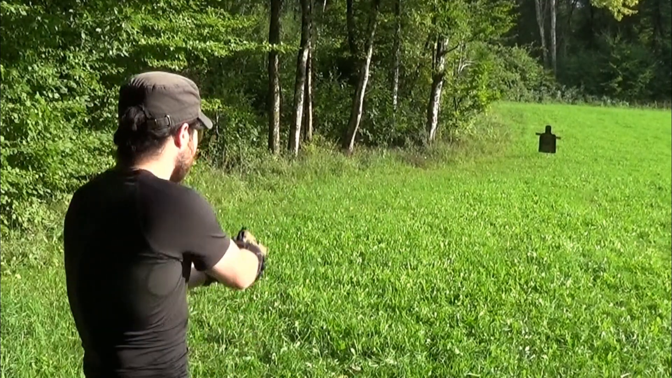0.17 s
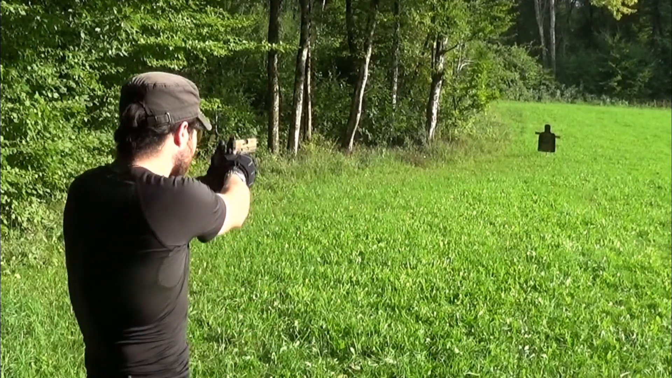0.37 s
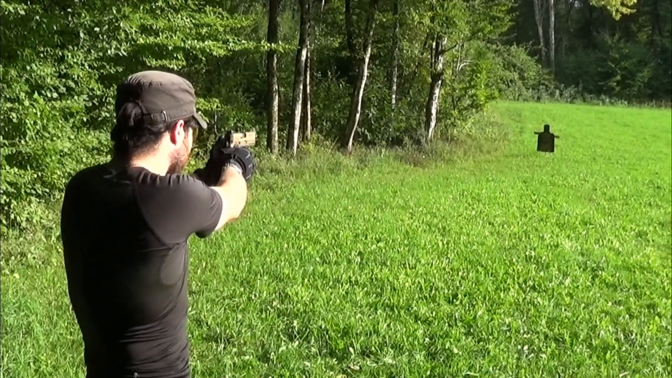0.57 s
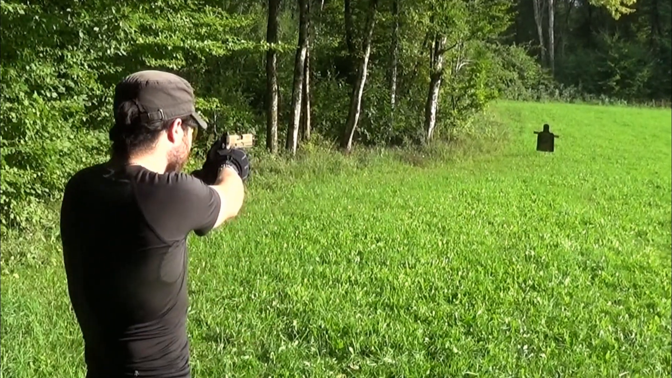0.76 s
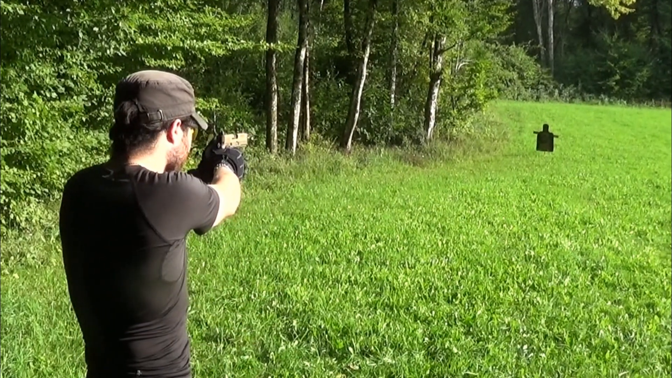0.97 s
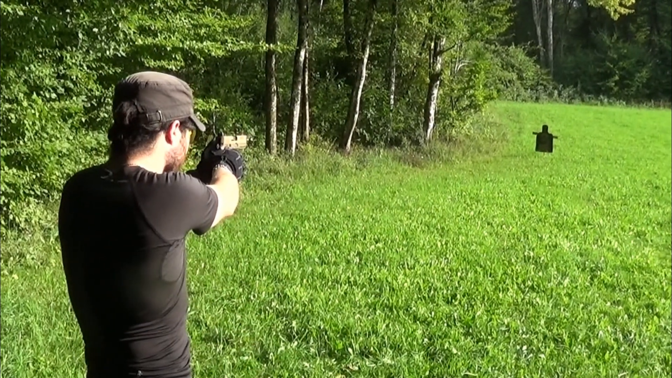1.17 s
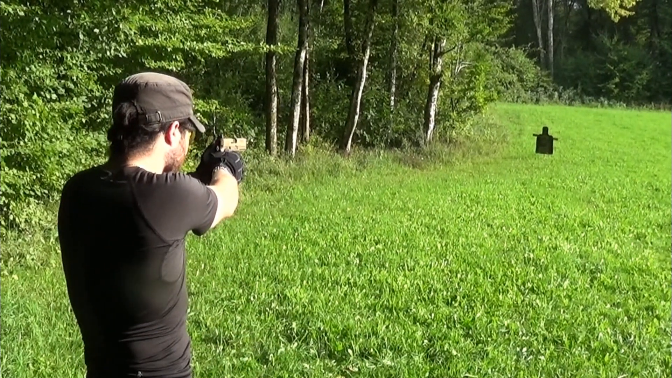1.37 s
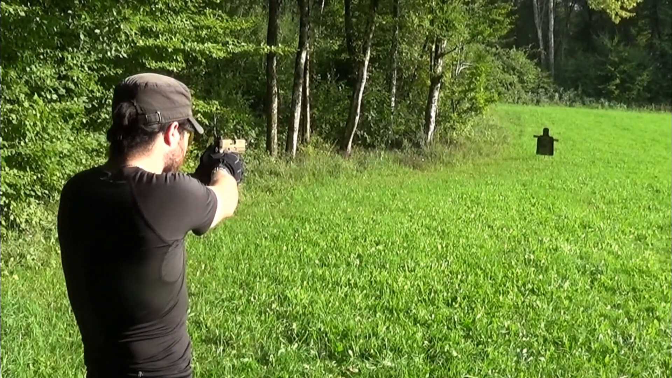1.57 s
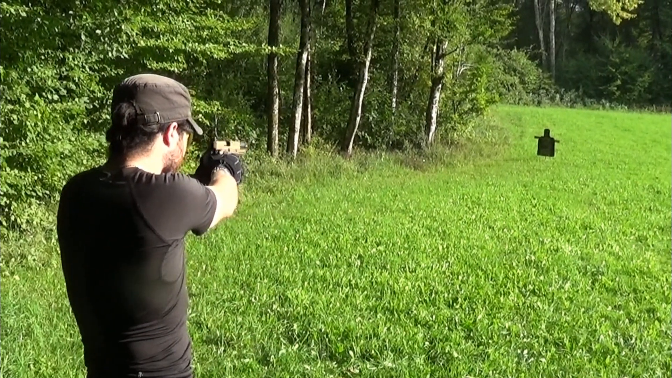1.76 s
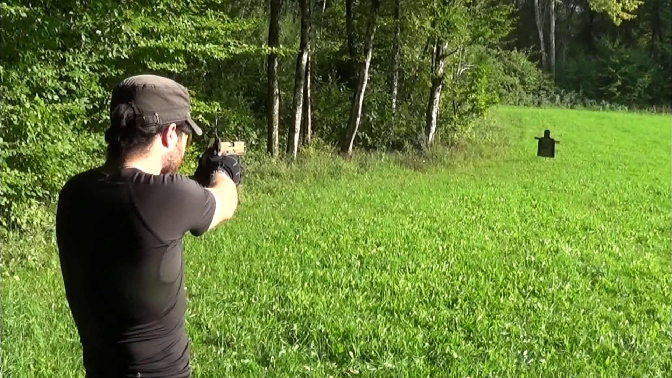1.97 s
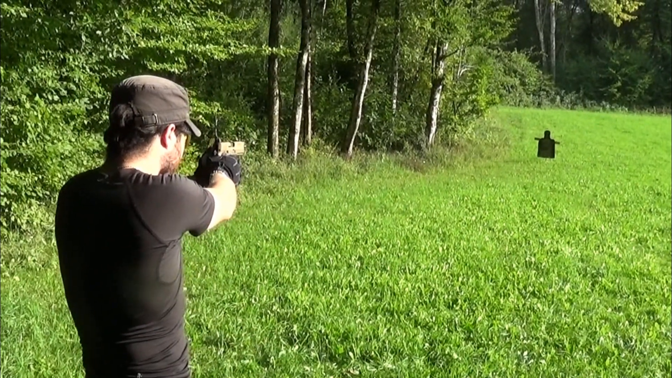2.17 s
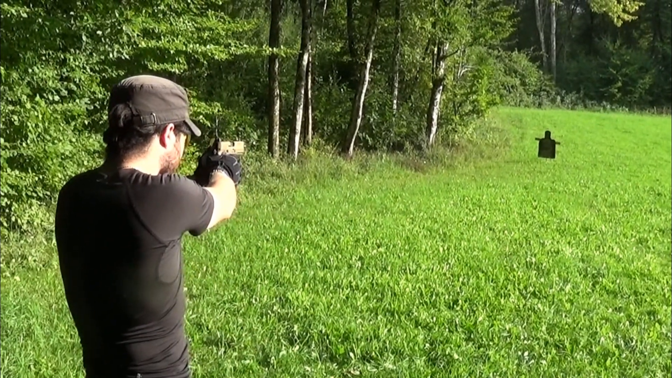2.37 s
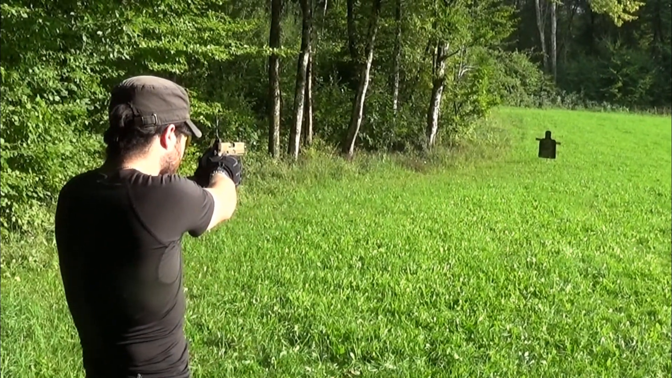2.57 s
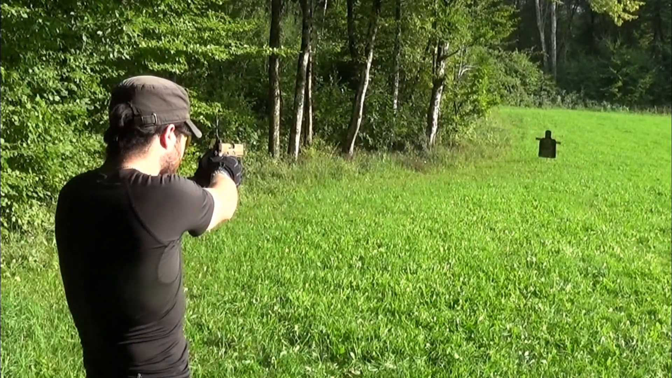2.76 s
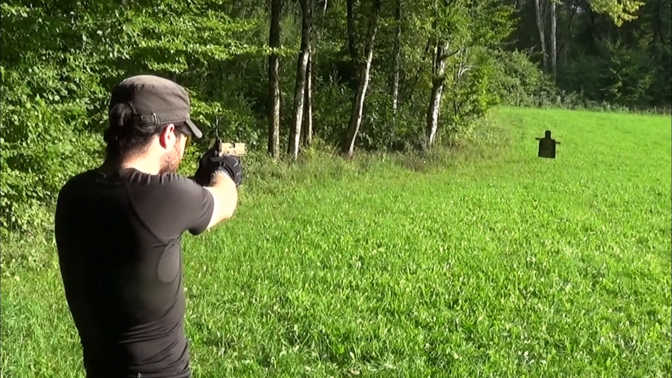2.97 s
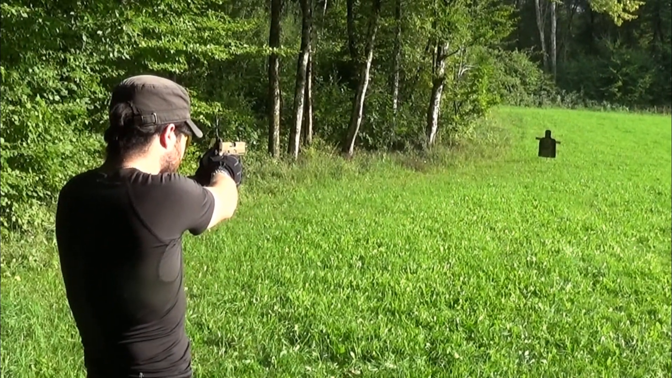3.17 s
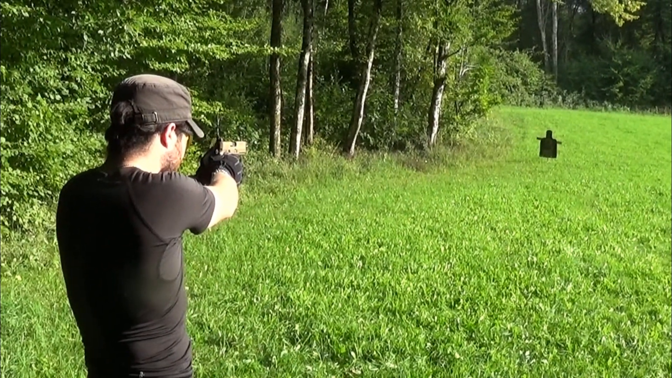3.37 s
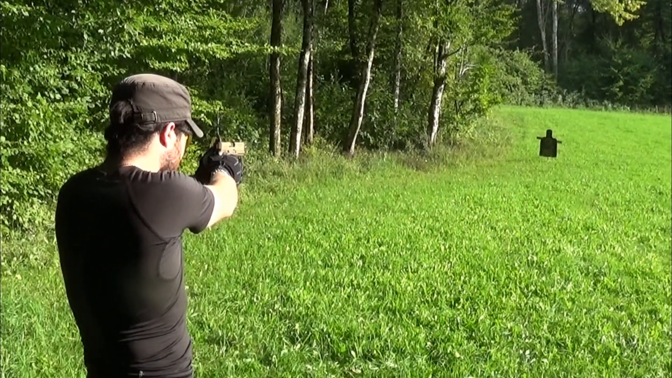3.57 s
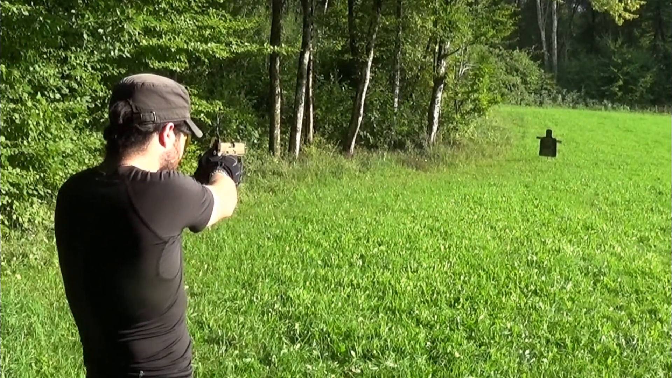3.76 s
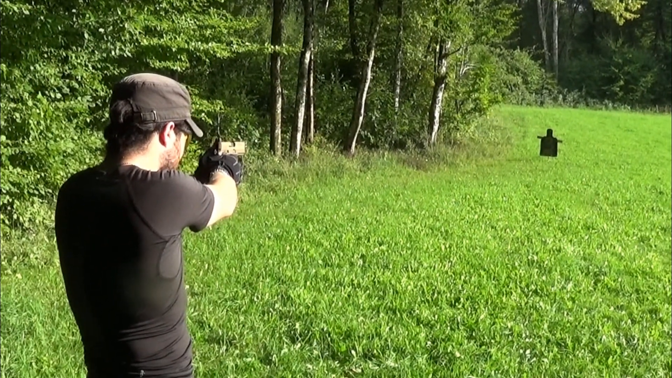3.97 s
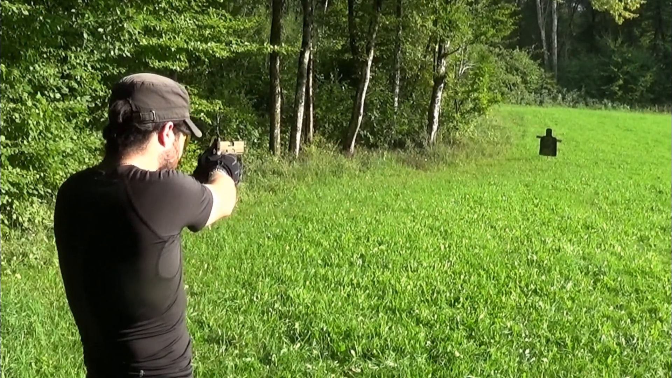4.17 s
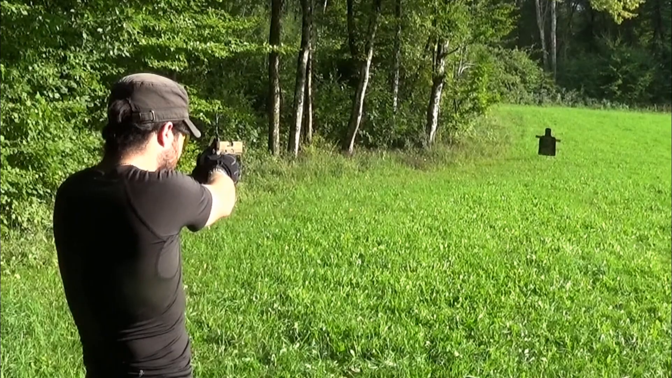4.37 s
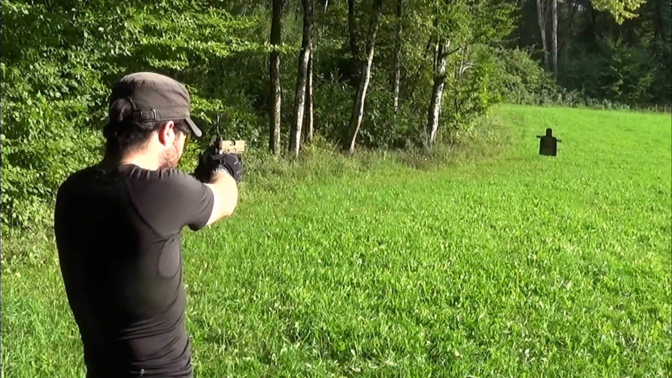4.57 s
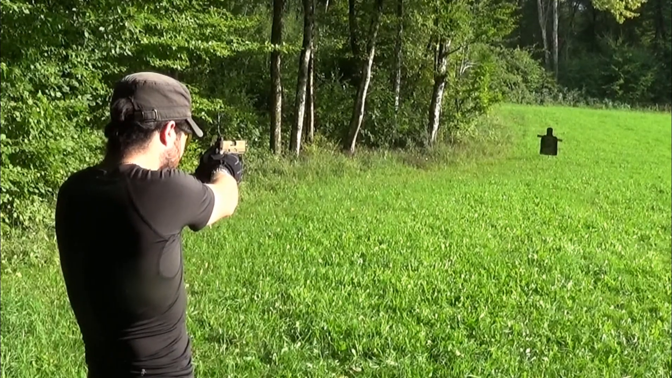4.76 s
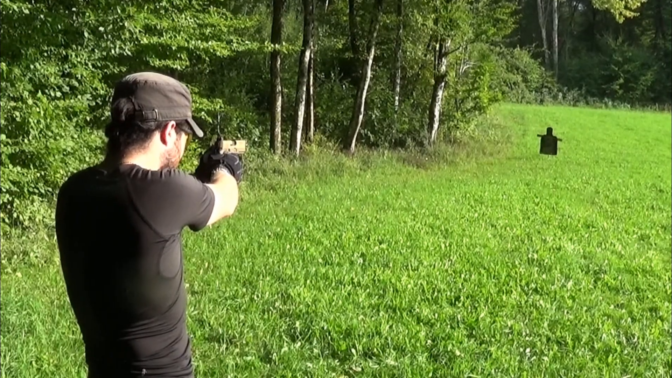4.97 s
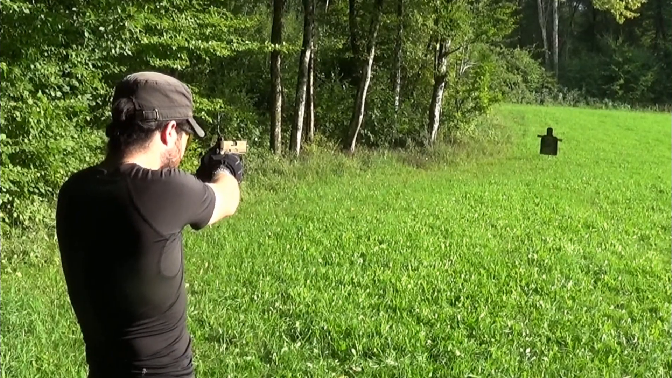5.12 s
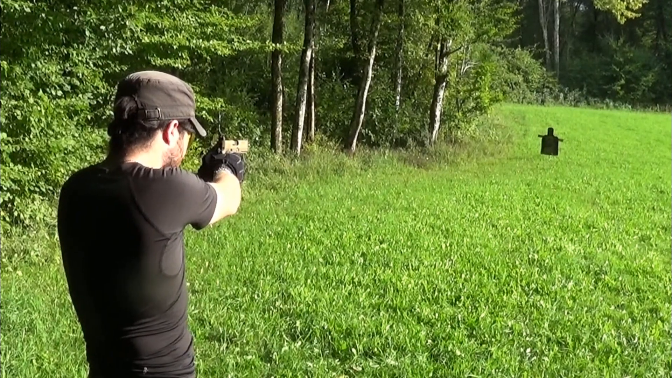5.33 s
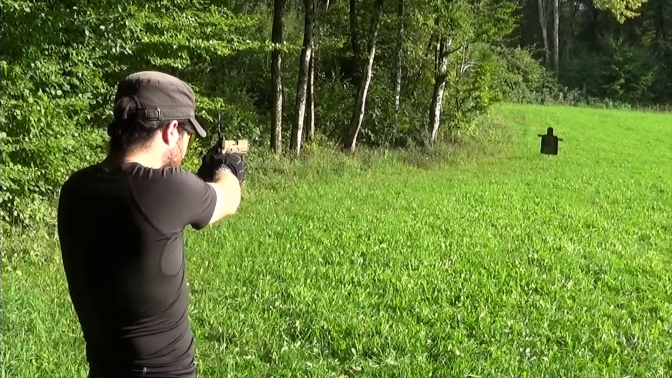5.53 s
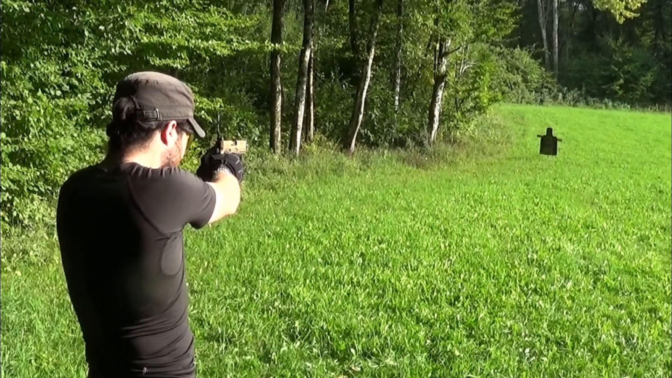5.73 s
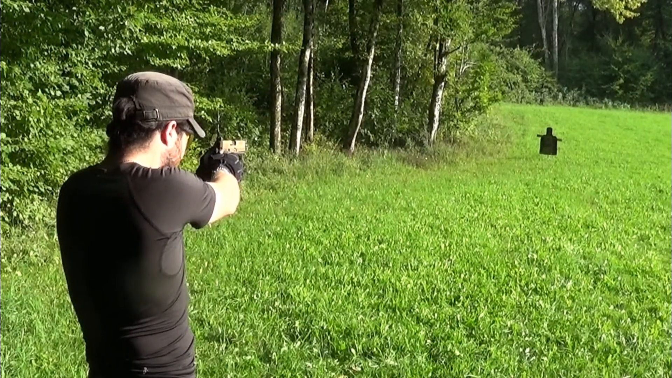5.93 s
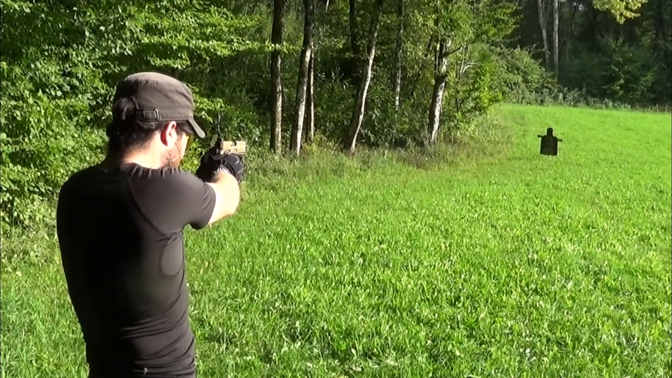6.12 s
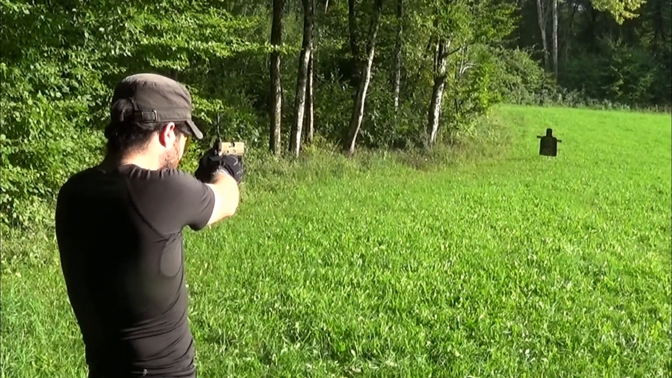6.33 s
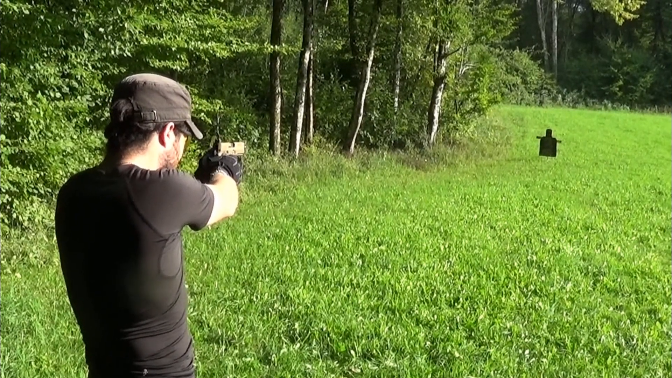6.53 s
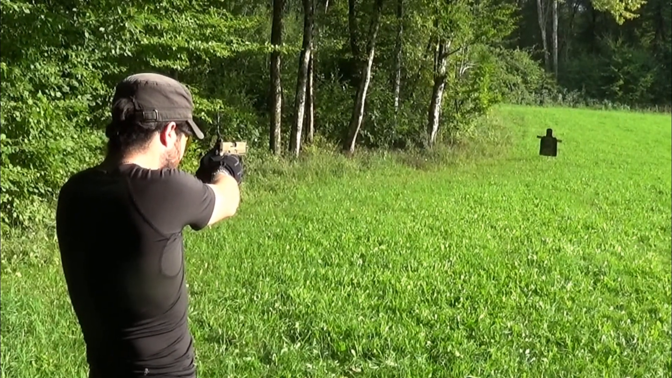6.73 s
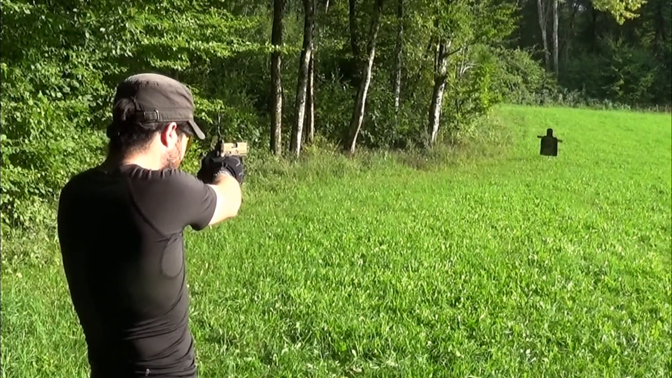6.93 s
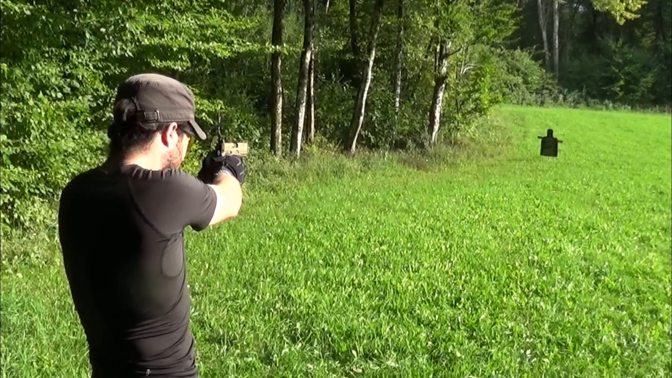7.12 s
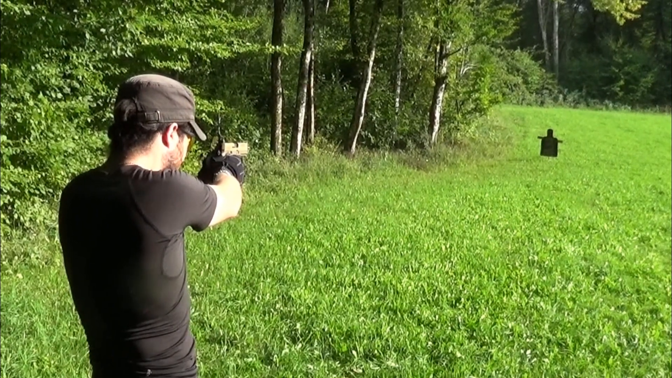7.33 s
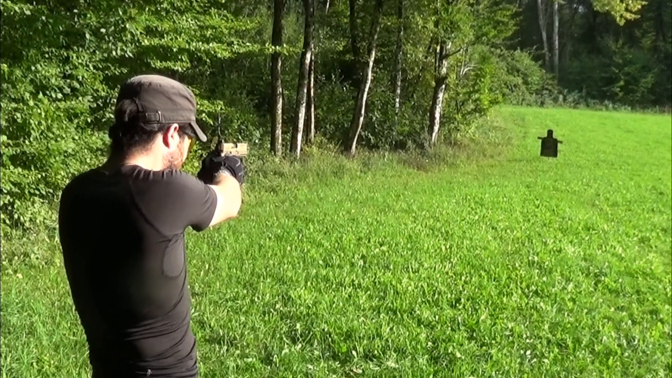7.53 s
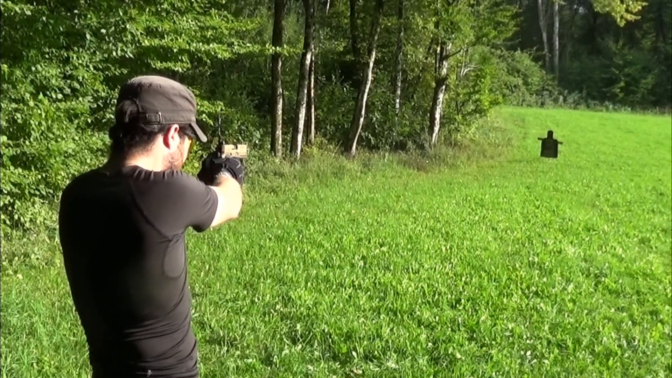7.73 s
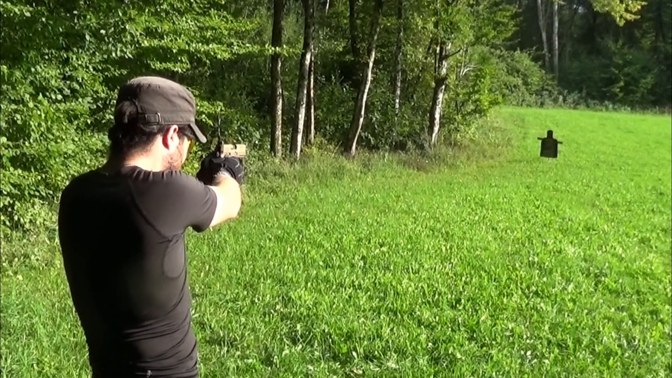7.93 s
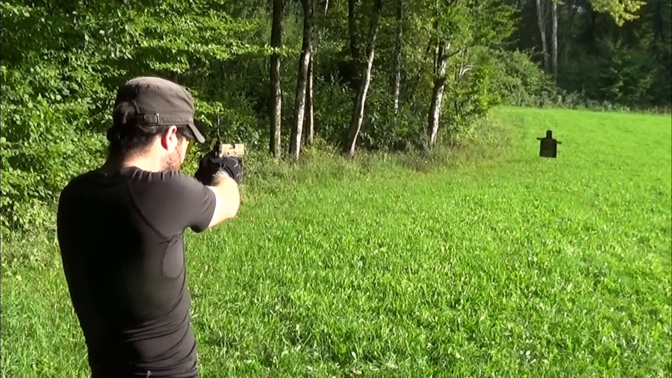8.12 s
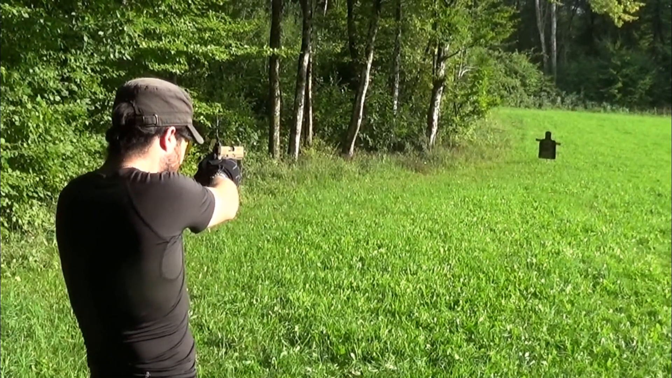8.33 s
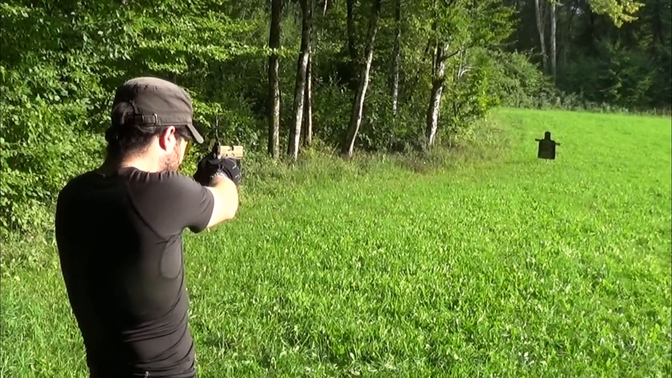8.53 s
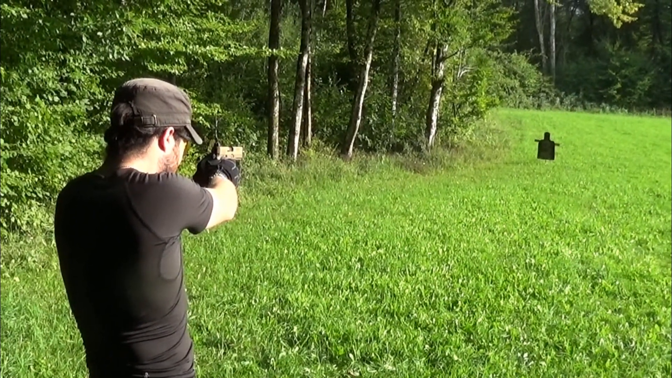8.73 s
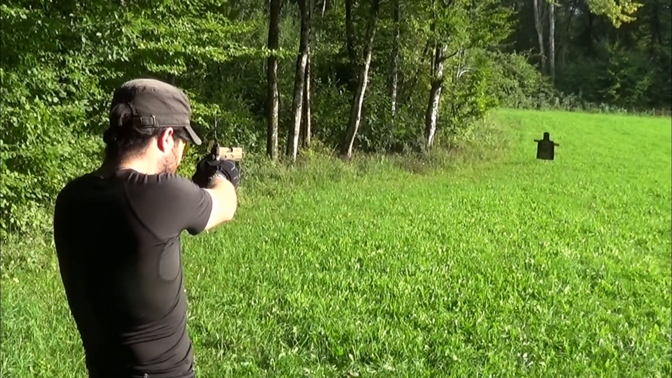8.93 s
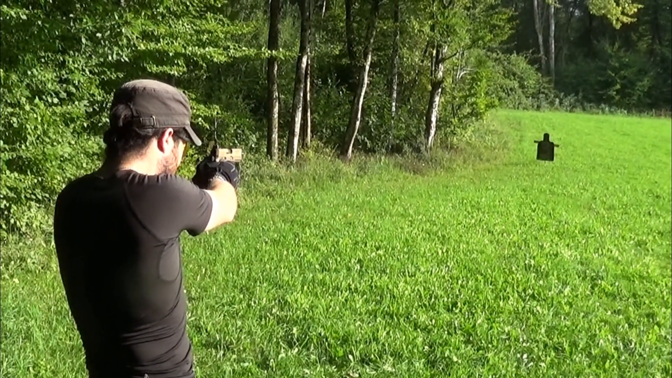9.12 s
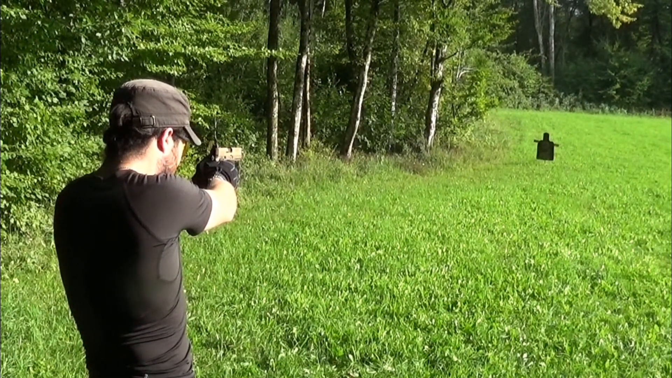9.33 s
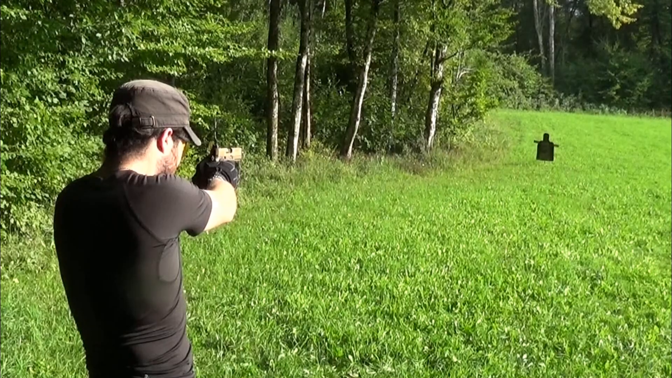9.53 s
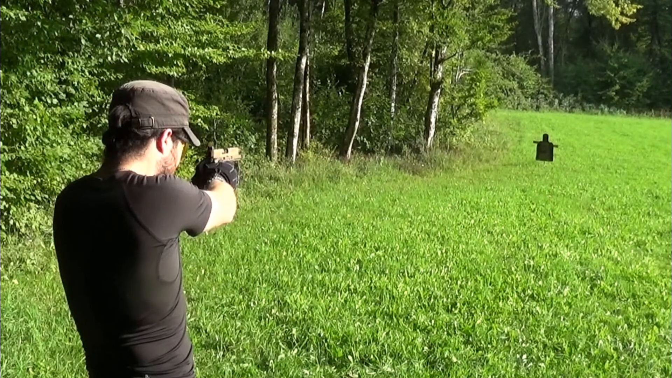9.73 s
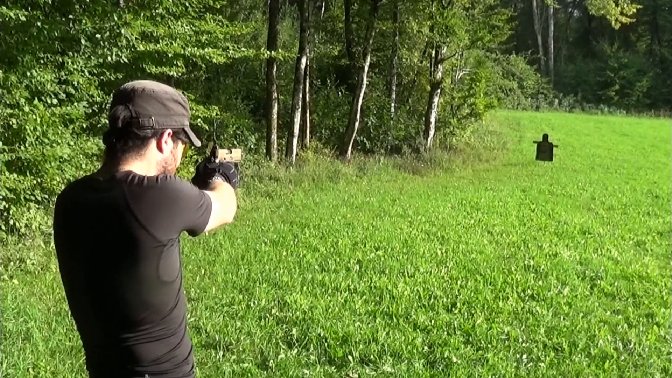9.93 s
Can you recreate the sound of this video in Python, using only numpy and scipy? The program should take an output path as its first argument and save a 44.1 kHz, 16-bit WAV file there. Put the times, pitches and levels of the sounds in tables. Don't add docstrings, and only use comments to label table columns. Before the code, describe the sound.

Outdoors in a meadow beside trees, sleeves rustle and small dry clicks sound as a pistol comes up. After a pause, a gas air pistol fires twelve single shots, each a sharp pop, quick metallic slide clack and short hiss. Most are followed half a second later by a flat cardboard slap far off. The microphone is about two metres from the shooter; trees return a diffuse tail.

```python
import sys
import numpy as np
from scipy import signal
from scipy.fft import rfft, irfft, next_fast_len
from scipy.io import wavfile
from scipy.ndimage import uniform_filter1d, map_coordinates

SR = 44100
rng = np.random.default_rng(int(sys.argv[2]) if len(sys.argv) > 2 else 0)


def amplitude_ratio(level_db):
    exponent = np.asarray(level_db, float) / 20
    return 10 ** exponent


def materialize(psi):
    bounded = np.clip(np.atleast_2d(psi).T, -1, 1)
    quanta = np.round(bounded * 32767).astype(np.int16)
    wavfile.write(sys.argv[1], SR, quanta)


N = 440559
TIME = np.arange(N) / SR

# start_s, pop_db, gas_db, slam_db
SHOTS = [(1.8884, -2, -2.5, -12), (2.8315, -2.5, -1.5, -8.5), (3.717, -4.5, -0.5, -8.5),
         (4.4392, -3, -1, -7), (5.119, -2, -0.5, -8), (5.7371, -2.5, -0.5, -7), (6.3594, -2.5, 0, -6.5),
         (6.9605, -0.5, 0.5, -9.5), (7.6767, -2.5, -1, -7.5), (8.3543, 0, -1, -8),
         (9.0977, -1.5, -0.5, -7.5), (9.8319, -2.5, -0.5, -8)]
CYCLE_MS = [69.3, 63.4, 67.8, 64.4, 65, 64.9, 62.3, 63.2, 66.4, 64.4, 66.4, 65.1]
USUAL_CYCLE_MS = 64


def colour(x, points):
    hz, db = np.transpose(points)
    size = next_fast_len(x.shape[-1])
    bins = np.log(np.arange(size // 2 + 1) * SR / size + 1)
    gain = amplitude_ratio(np.interp(bins, np.log(hz), db))
    return irfft(rfft(x, size) * gain, size)[..., :x.shape[-1]]


def unit(x):
    return x / np.sqrt(np.mean(x ** 2))


def stereo(mid, side, extra_db, wide=None):
    # pitch_hz, side_minus_mid_db
    usual_width = [(60, -12), (110, -22), (200, -36), (380, -25), (700, -12), (1290, -7.5), (2380, -8),
                   (4400, -7.5), (8120, -9.5), (15000, -22)]
    side = colour(side, wide or usual_width) * amplitude_ratio(extra_db)
    return np.array([mid + side, mid - side])


def ring(x, modes):
    out = 0
    for hz, width, db in modes:
        r = np.exp(-np.pi * abs(width) / SR)
        poles = [1, -2 * r * np.cos(2 * np.pi * hz / SR), r * r]
        out = out + amplitude_ratio(db) * np.sqrt((1 - r) / 2) * signal.lfilter([1, 0, -1], poles, x)
    return out


def add(track, s, piece):
    i = int(s * SR)
    track[..., i:i + piece.shape[-1]] += piece[..., :N - i]


def knock(ms, noise, sharp=2.5, order=1):
    t_ms = np.arange(len(noise)) / SR * 1000
    rattle = noise * np.exp(-(t_ms / max(ms, .05)) ** order)
    rattle[0] = -sharp
    return rattle


def air():
    # pitch_hz, level_db_per_hz
    hiss = [(15, -42), (25, -1), (70, -3.5), (236, -6), (277, -5.5), (344, -6.5), (373, -6.5),
            (1260, -12.5), (1370, -12), (3340, -15.5), (12500, -24.5), (16000, -25.5)]
    # pitch_hz, side_minus_mid_db
    hiss_width = [(60, -20), (110, -14.5), (200, -6.5), (380, -1.5), (700, 0.5), (1290, 1), (2380, -1.5),
                  (4400, -5), (8120, -7), (15000, -23)]
    swell = unit(uniform_filter1d(rng.standard_normal(N), size=9000))
    mid, side = unit(colour(rng.standard_normal((2, N)), hiss))
    return stereo(mid, side, 0., hiss_width) * amplitude_ratio(-61.5 + 0.67 * swell)


def sleeves():
    # loudest_s, level_db, rise_db_per_s, fall_db_per_s
    sweeps = [
        (0.17, -56, -5, 164),
        (0.44, -53.5, 57, 400.0),
        (0.476, -63, 60.0, 37),
    ]
    # pitch_hz, level_db_per_hz
    cloth = [(530, -4), (900, -1), (1590, -6.5), (1990, -7), (2390, -3), (2830, -7), (3110, -4.5),
             (4630, -8.5), (4980, -5), (9880, -8.5), (16000, -18)]
    effort = np.zeros(N)
    for s, db, rise, fall in sweeps:
        effort += amplitude_ratio(db + np.minimum(rise * (TIME - s), fall * (s - TIME)))
    crackle = rng.exponential(size=N // 60 + 1).clip(0, 3.5).repeat(60)[:N]
    grain = amplitude_ratio(2.2 * uniform_filter1d(crackle, size=40))
    rub = colour(rng.standard_normal(N), cloth)
    rub = rub + 1.2 * ring(rub, [(9900, 2300, 0)])
    return unit(rub * grain) * effort


def hands():
    # start_s, peak_db,
    # pitch_hz, bright_db
    ticks = [(0.148, -36, 9890, -2), (0.1694, -41, 9080, 2.5), (0.3805, -30, 9770, 9),
             (0.4165, -29, 9780, 7), (0.4364, -39, 10700, -1), (0.4724, -33, 9390, 17),
             (0.54, -41, 1620, -3), (0.6719, -38, 3530, 16), (0.9616, -18, 10000, 9),
             (2.4986, -30, 2150, 3), (8.15, -34.5, 2410, -7), (8.3028, -27, 6750, 11)]
    # start_s, peak_db, pitch_hz
    bumps = [
        (0.12, -50, 650),
        (0.348, -45, 500),
        (0.379, -38, 550),
        (0.419, -45, 753),
        (3.5375, -33, 1650),
    ]
    out = sleeves()
    chance = rng.standard_normal((len(ticks), 600))
    for (s, db, hz, bright_db), noise in zip(ticks, chance):
        tick = knock(1.3, noise[::-1])
        tick = ring(tick, [(hz, 0.17 * hz, 0), (9000, 6000, bright_db), (3200, 2000, -6)])
        add(out, s, amplitude_ratio(db - 4.5) * tick / np.abs(tick).max())
    for s, db, hz in bumps:
        bump = ring(knock(2.3, chance[0]), [(hz, 700, 0)])
        add(out, s, amplitude_ratio(db) * bump / np.abs(bump).max())
    return out


def pistol_blows():
    # after_pop_ms, length_ms, grip_db, frame_db, slide_db
    cycle = [
        (-7.5, 4.4, -52, -49, -32),
        (-3.5, 3.2, -32, -23.5, -34),
        (0.94, 0.57, -25, -5, -2.5),
        (4.5, 1.6, -27, -12.5, -27),
        (10.5, 1.9, -28, -37, -8),
        (18.5, 4.6, -25.5, -12.5, -21),
        (37.5, 3.2, -20, -35, -13),
        (43, 8, -28, -22.5, -40),
        (46, 2.3, -18.5, -39, -31),
    ]
    # after_pop_ms, length_ms, level_db
    recoil = [
        (3.535, 1.6, -28.5),
        (10.23, 2.92, -22),
        (46.3, 1.3, -32.5),
    ]
    close_db = (-45, -31, -14.5, -7.5)
    knocks_db = -3.5
    follow = np.array([1, 1, 0.36, 1])
    blows = np.zeros((4, N))
    chance = rng.standard_normal((len(SHOTS), len(cycle) + 1, 900))
    usual = rng.standard_normal(chance.shape[1:])
    for (s, pop_db, _, slam_db), cycle_ms, noise in zip(SHOTS, CYCLE_MS, chance):
        slow = cycle_ms / USUAL_CYCLE_MS

        def at(ms):
            return s + .0007 + ms * (slow if ms > 20 else 1) / 1000

        for (ms, length, *db), own, same in zip(cycle, noise, usual):
            mixed = [0.35 * same + 0.75 * own, own, own]
            piece = np.array([knock(length, row) for row in mixed])
            shot_db = pop_db if ms < 2 else knocks_db
            level_db = np.array(db) + shot_db + 0.78 * own[-1]
            add(blows[1:], at(ms), piece * amplitude_ratio(level_db)[:, None])
        for (ms, length, db), own, same in zip(recoil, noise, usual[[3, 4, 8]]):
            add(blows[0], at(ms), knock(length, same) * amplitude_ratio(db + knocks_db + own[-2]))
        slam = knock(7.1, noise[0][::-1], sharp=1.2, order=4)
        slam = slam + amplitude_ratio(-14) * knock(5.4, noise[-1][::-1], sharp=0)
        add(blows, s + cycle_ms / 1000, slam * amplitude_ratio(np.array(close_db) + follow * slam_db)[:, None])
    return blows


def gas_flow():
    flow = np.zeros(N)
    t_ms = np.arange(int(SR / 5)) / SR * 1000
    vent_ms = [1, 5.1, 60.0, 57, 70, 118, 161, 200]
    vent_db = [-57.5, -24, -24, -35, -35, -35, -45.5, -61]
    for (s, _, gas_db, _), cycle_ms in zip(SHOTS, CYCLE_MS):
        slow = cycle_ms / USUAL_CYCLE_MS
        add(flow, s, amplitude_ratio(gas_db + np.interp(t_ms / slow, vent_ms, vent_db)))
    return flow


def pistol():
    # pitch_hz, width_hz, level_db
    thump_modes = [(192.4, 27.5, -3.5), (266, 87, -2.5), (454, 80, -2), (654, 154, 1.5)]
    grip_modes = [(1150, 120, 0.41), (1715, 230, 0.026)]
    frame_modes = [(2300, 37, -15), (2783, 110, -5.5), (3390, 940, -1), (4980, 740, -9.5)]
    slide_modes = [(6580, 1800, -2), (7400, 120, -15.5), (7680, 86, -9.5), (8700, 150, -13),
                   (9520, 470, -6.5), (10660, 1200, -13)]
    # pitch_hz, level_db_per_hz
    gas = [(150, -54), (250, -14), (373, -17.5), (538, -14.5), (1120, -8), (1330, -12.5), (2020, -6.5),
           (2240, -4.5), (4990, -7.5), (8850, 0.5), (11700, -2), (16000, -17)]
    blows = pistol_blows()
    thump = ring(blows[0], thump_modes)
    grip = ring(blows[1], grip_modes)
    frame = ring(blows[2], frame_modes)
    slide = ring(blows[3], slide_modes)
    body = thump + grip + frame + slide

    sputter = amplitude_ratio(1.8 * unit(uniform_filter1d(rng.standard_normal(N), size=25)))
    jets = unit(colour(rng.standard_normal((2, N)), gas)) * gas_flow() * sputter
    sung = 0.34 * ring(jets[0], slide_modes + frame_modes)

    thrown = 0.29 * (thump + grip) + 0.073 * frame + 0.7 * slide
    thrown = thrown + 0.41 * ring(blows[2], [(2500, 450, -2), (3430, 590, 0)])
    blast = 1.24 * colour(blows[2] + blows[3], gas)
    return body + jets[0] + sung, jets[1] + sung, thrown + blast + jets[0]


def wood(echoes, size):
    # pitch_hz, level_db, first_t60_s, late_level_db, late_t60_s
    octaves = [(124.4, -18, 0.98, -24, 7), (240, -9.5, 0.77, -25.5, 1.8), (510, -5, 0.38, -19.5, 6.2),
               (857, -13.5, 0.55, -19, 2.54), (1946, -6.5, 0.53, -25.5, 4.9),
               (3700, -6.5, 0.43, -24.5, 1.93), (7350, -5.5, 0.31, -22, 0.98), (13100, -15, 0.37, -44, .7)]
    t = np.arange(size) / SR
    out = np.zeros((2, size))
    for hz, db, t60, late_db, late_t60 in octaves:
        octave = signal.butter(2, [hz / 1.41, hz * 1.41], "band", fs=SR, output="sos")
        band = signal.sosfilt(octave, rng.standard_normal((2, size)))
        out += band * (amplitude_ratio(db - 60 * t / t60) + amplitude_ratio(late_db - 60 * t / late_t60))
    out *= np.clip(t / 0.0015, 0, 1) / np.sqrt(SR / 20)
    click = np.eye(1, 400)[0]
    for s, db, hz in echoes:
        add(out[0], s, amplitude_ratio(db) * ring(click, [(hz, .5 * hz, 0)]))
    return stereo(*out, 1.26)


def scatter(x, answer):
    return signal.fftconvolve(x[None], answer, axes=1)[:, :N]


def sway(x):
    k = SR // 4
    wander = uniform_filter1d(uniform_filter1d(rng.standard_normal(N), k), k)
    drift = unit(wander) * 0.4 * SR / 1000
    return np.array([map_coordinates(row, [np.arange(N) - drift], mode="nearest") for row in x])


def far_air(x):
    return signal.sosfilt(signal.butter(2, 9500, fs=SR, output="sos"), x)


def meadow_edges():
    # delay_s, peak_db, pitch_hz
    returns = [
        (0.1392, -13.5, 2300),
        (0.3685, -33, 2400),
    ]
    out = np.zeros(N)
    noise = rng.standard_normal(500)
    for lag, db, hz in returns:
        back = ring(knock(3.6, noise), [(hz, 900, 0), (4200, 2500, -6)])
        for (s, *_), luck in zip(SHOTS, rng.standard_normal(len(SHOTS))):
            if s + lag < N / SR:
                add(out, s + lag, amplitude_ratio(db - 8.5 + 0.5 * luck) * back / np.abs(back).max())
    return far_air(out)


def target():
    # start_s, peak_db, panel_pitch_hz, crack_db, deep_panel_db
    hits = [(2.3613, -7, 1970, -2, -10), (3.3063, -5, 1630, -2, -8), (4.1893, -6, 2060, -1.5, -3),
            (4.9130, -12, 2070, -2.5, -13.5), (5.5937, -4.5, 1720, 0, -11.5), (6.2146, -4.5, 1810, 1, -5),
            (7.4377, -4.5, 1580, 0, -1), (8.8326, -6, 1880, -3.5, -11), (9.5777, -4, 3470, 26.5, -2)]
    direct, wet = np.zeros(N), np.zeros(N)
    chance = rng.standard_normal((len(hits), 2, 4000))
    for (s, db, hz, crack_db, deep_db), (noise, rumble) in zip(hits, chance):
        weak = max(0., -8 - db)
        glance = 0.06 * amplitude_ratio(1.5 * weak)
        blow = knock(2.5 + .5 * weak, glance * noise, sharp=-0.62 * amplitude_ratio(-0.8 * weak))
        blow = np.convolve(blow, np.hanning(6))
        crack = ring(blow, [(3630, 6900, crack_db), (7640, 18000, crack_db - 4)])
        panel = ring(blow, [(hz, 0.52 * hz, 2.5), (1100, 300, deep_db)])
        slap = crack - np.roll(panel, int(.00013 * SR))
        slap = slap + .3 * np.roll(panel, int(.0028 * SR))
        trunks = .1 * np.roll(slap, int(0.009 * SR)) - 0.14 * np.roll(slap, int(.0105 * SR))
        slap = slap + trunks
        boom_db = -45 - 0.85 * db
        boom = ring(np.convolve(knock(23.5, rumble, sharp=0), np.hanning(6)), [(199, 98, boom_db)])
        add(direct, s + 0.00109, amplitude_ratio(db) * (slap / np.abs(slap).max() + boom))
        edge = 0.26 * amplitude_ratio(crack_db)
        add(wet, s + .003, amplitude_ratio(db - 0.47 - 0.4 * crack_db) * np.array([1 + edge, -edge]))
    return far_air(direct), wet


def scene():
    # delay_s, level_db, pitch_hz
    treelines = [
        (0.079, -22, 580),
        (.11, -25.5, 625),
    ]
    # pitch_hz, level_db_per_hz
    panel_tail = [(59, -30), (100, -9), (262, -10), (434, -18.5), (607, -8.5), (1160, -1), (1350, -2),
                  (2130, -4.5), (6350, -12.5), (15000, -29.5)]
    rustle = hands()
    gun, across, outward = pistol()
    slap, wet = target()
    near = stereo(gun + rustle + slap + meadow_edges(), across, -0.52)
    gun_tail = sway(scatter(outward + 0.91 * rustle, wood(treelines, size=66000)))
    lean_db = np.array([[-.5], [.5]])
    around_target = colour(wood([], size=48000), panel_tail) * amplitude_ratio(23.5 + lean_db)
    return near + gun_tail + scatter(wet, around_target) + air()


def top_cut(x):
    return signal.sosfilt(signal.butter(12, 16660, fs=SR, output="sos"), x)


def record(dry):
    dry = signal.sosfilt(signal.butter(2, 60, "high", fs=SR, output="sos"), dry)
    dry = np.tanh(1.5 * dry) / 1.4
    dry = signal.sosfilt(signal.ellip(8, .3, 50, 15700, fs=SR, output="sos"), dry)
    return top_cut(dry)


dry = scene()
out = record(dry)
materialize(out)
```